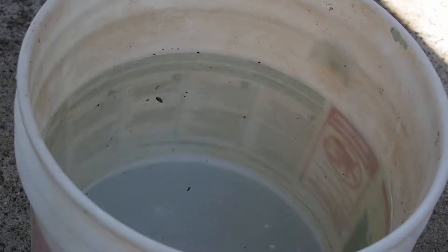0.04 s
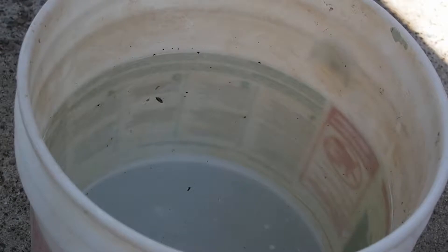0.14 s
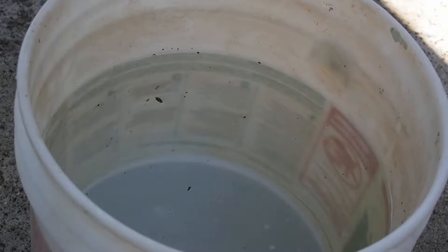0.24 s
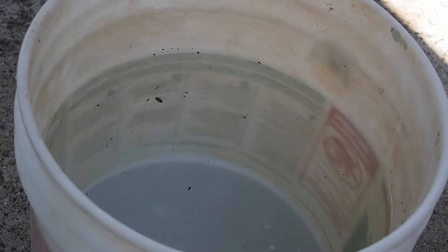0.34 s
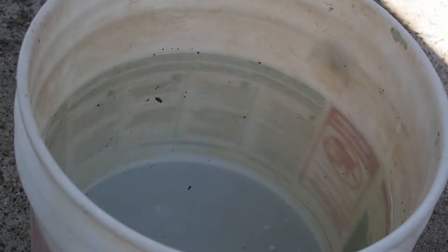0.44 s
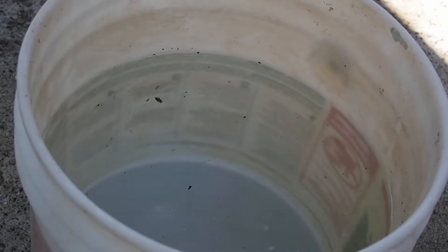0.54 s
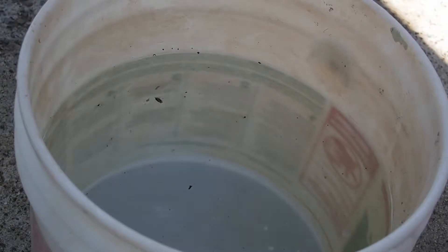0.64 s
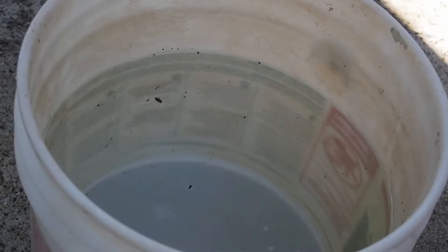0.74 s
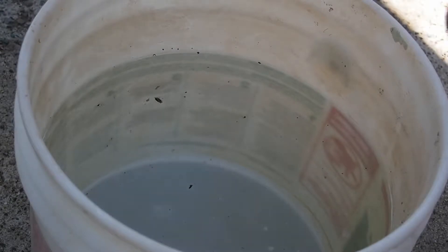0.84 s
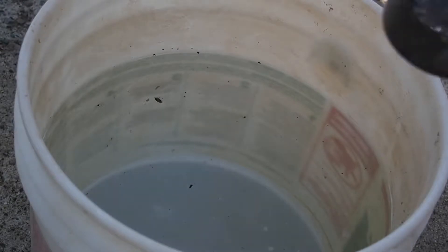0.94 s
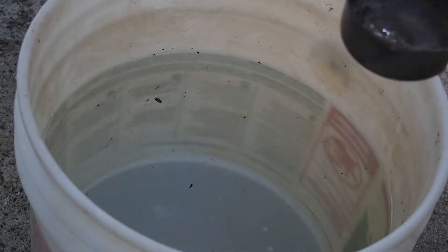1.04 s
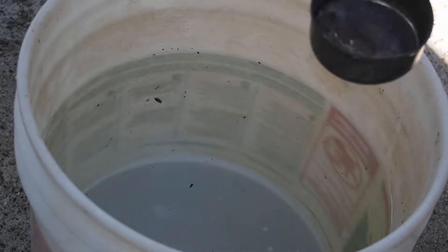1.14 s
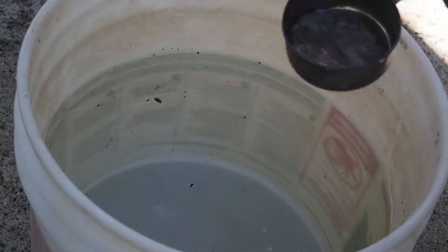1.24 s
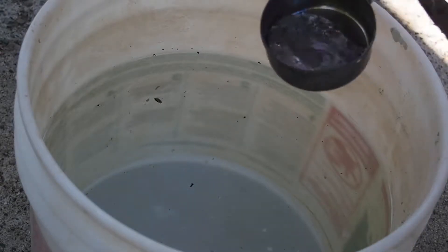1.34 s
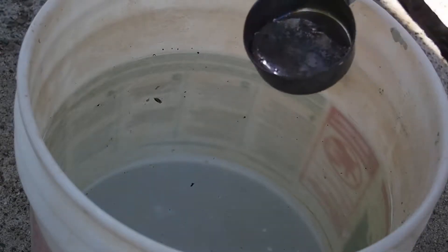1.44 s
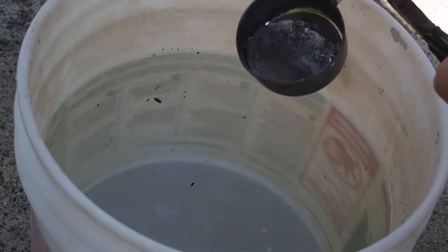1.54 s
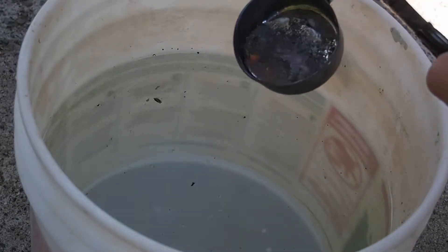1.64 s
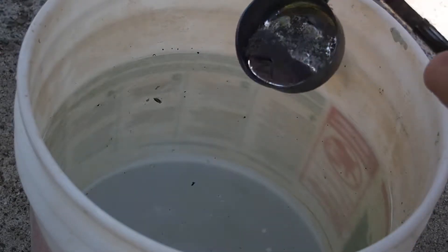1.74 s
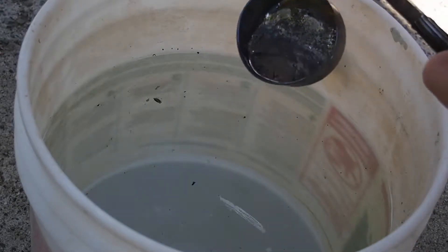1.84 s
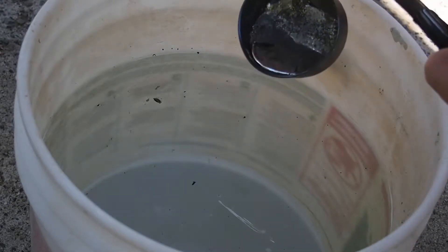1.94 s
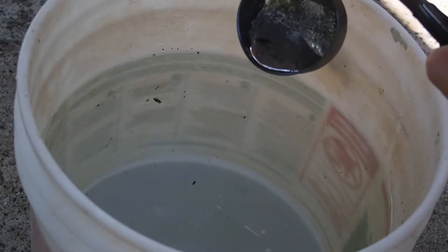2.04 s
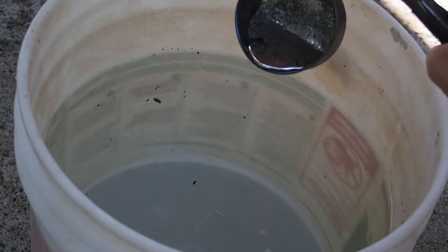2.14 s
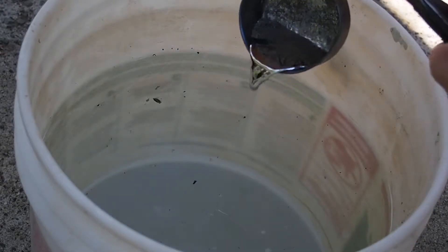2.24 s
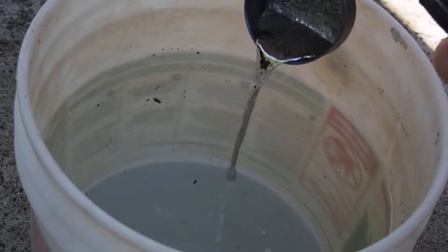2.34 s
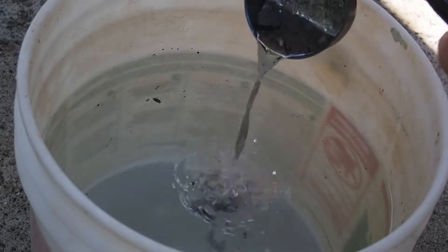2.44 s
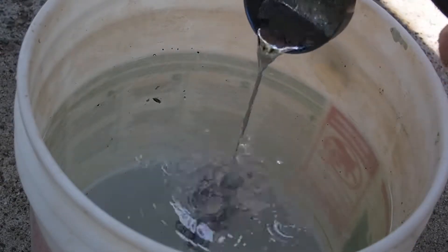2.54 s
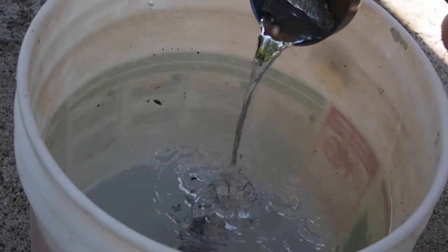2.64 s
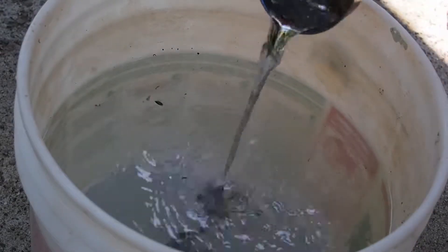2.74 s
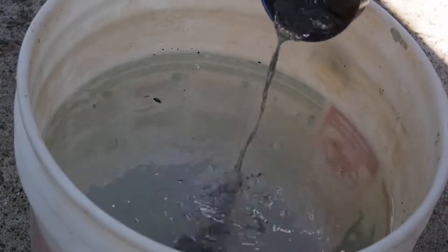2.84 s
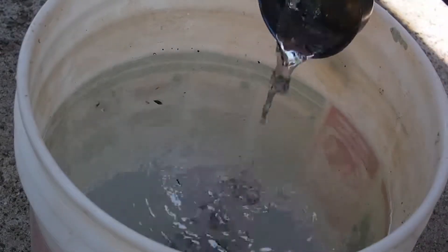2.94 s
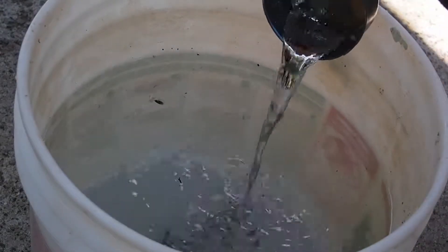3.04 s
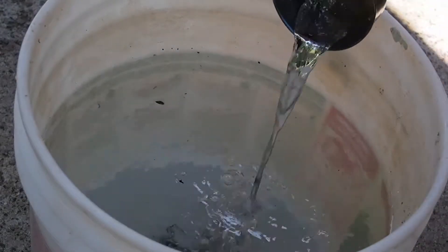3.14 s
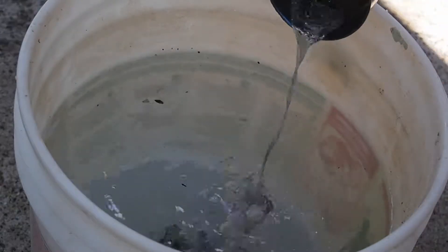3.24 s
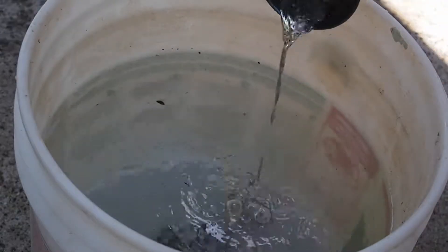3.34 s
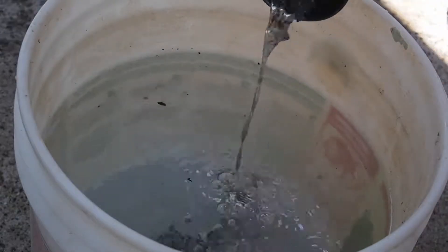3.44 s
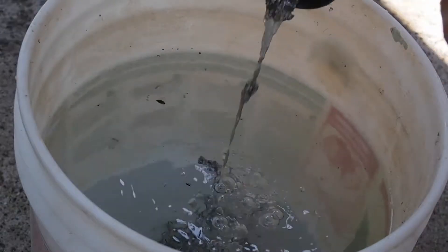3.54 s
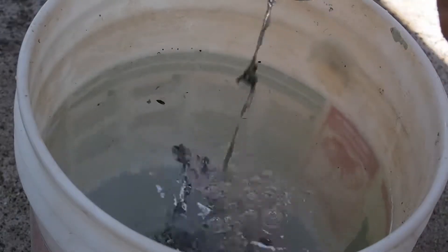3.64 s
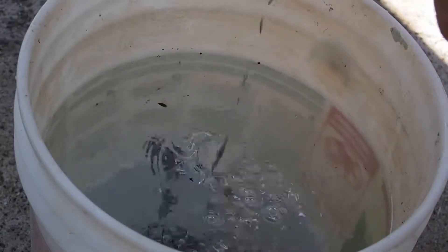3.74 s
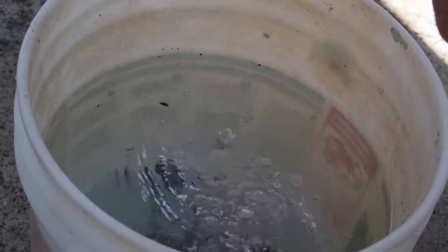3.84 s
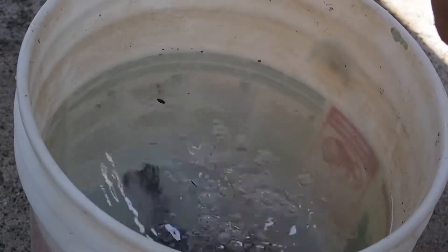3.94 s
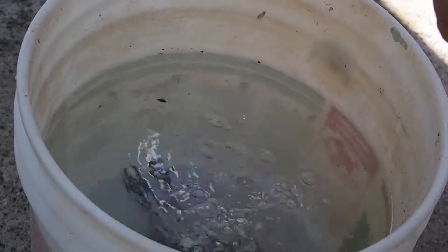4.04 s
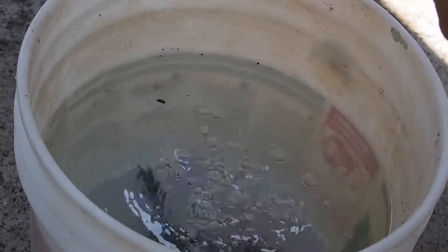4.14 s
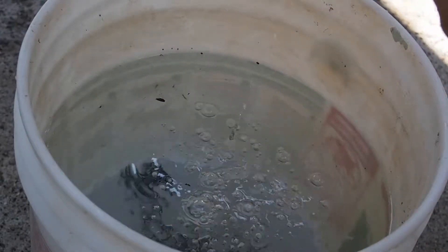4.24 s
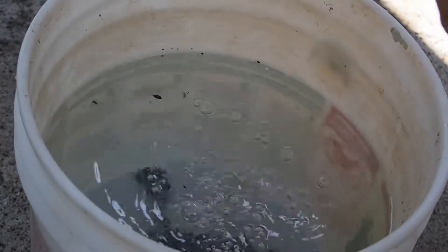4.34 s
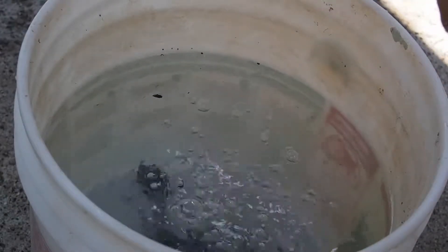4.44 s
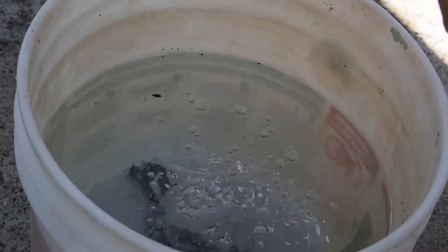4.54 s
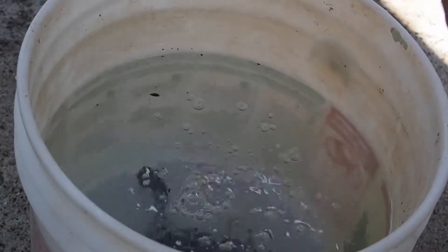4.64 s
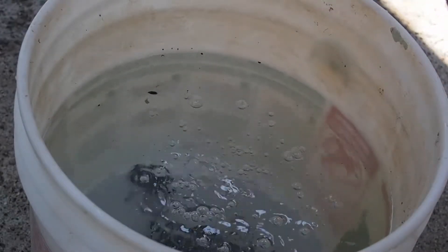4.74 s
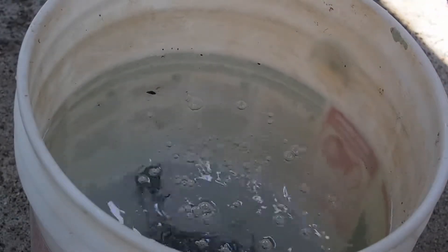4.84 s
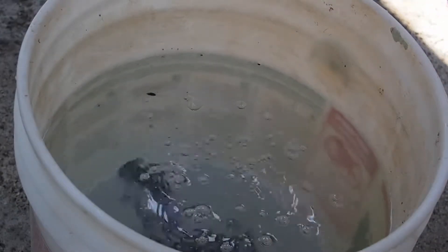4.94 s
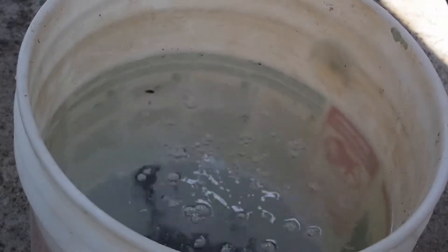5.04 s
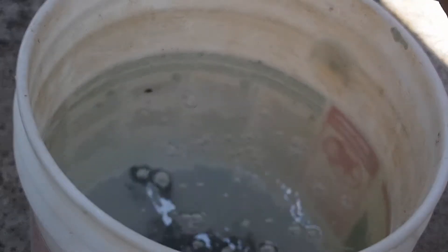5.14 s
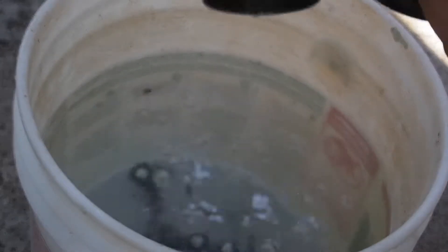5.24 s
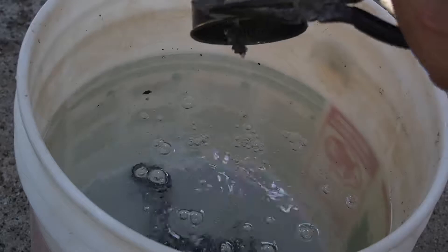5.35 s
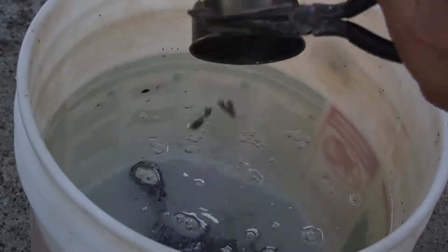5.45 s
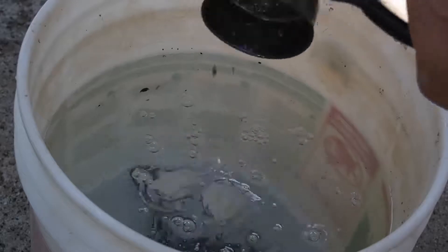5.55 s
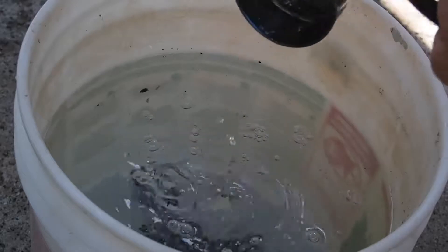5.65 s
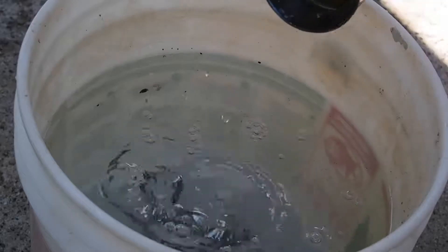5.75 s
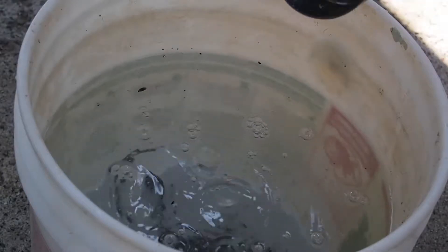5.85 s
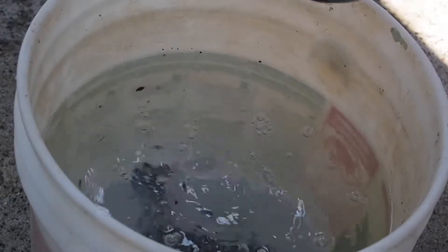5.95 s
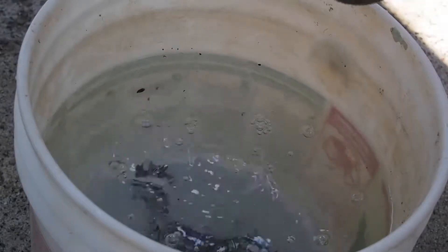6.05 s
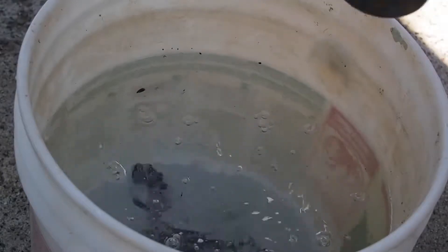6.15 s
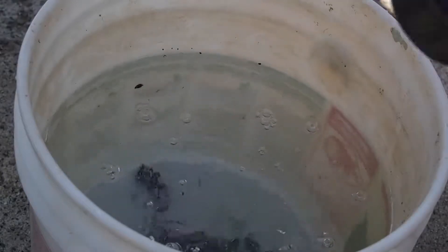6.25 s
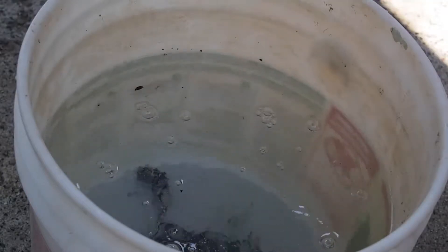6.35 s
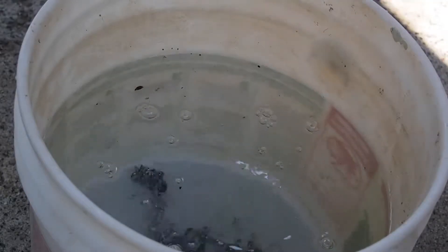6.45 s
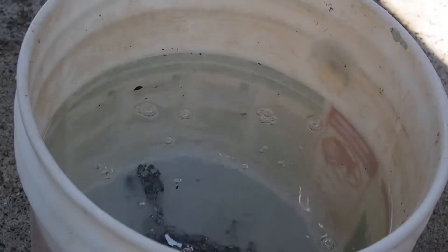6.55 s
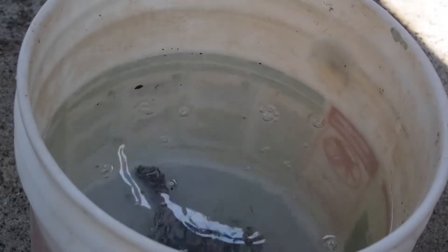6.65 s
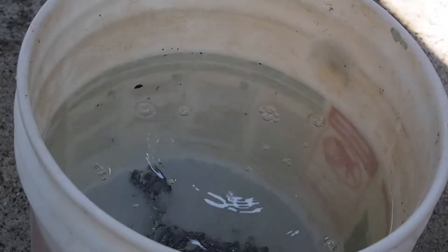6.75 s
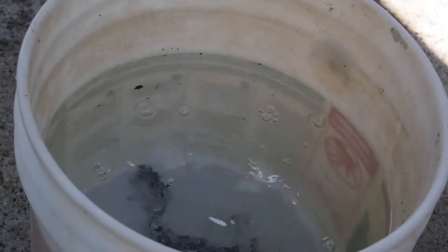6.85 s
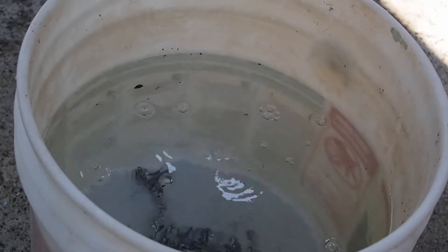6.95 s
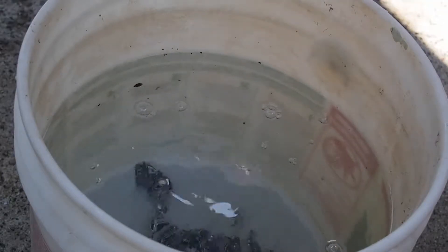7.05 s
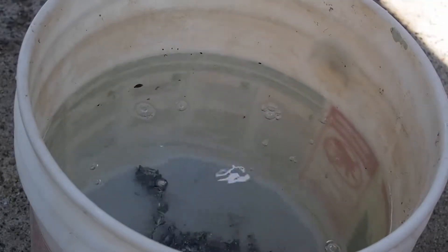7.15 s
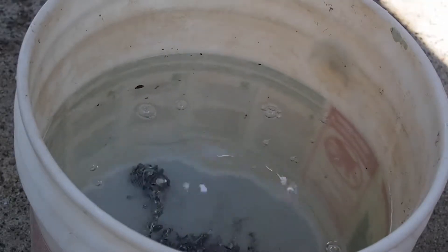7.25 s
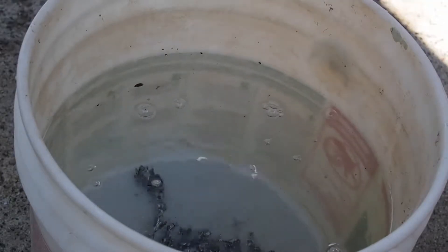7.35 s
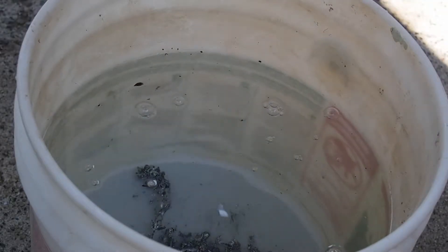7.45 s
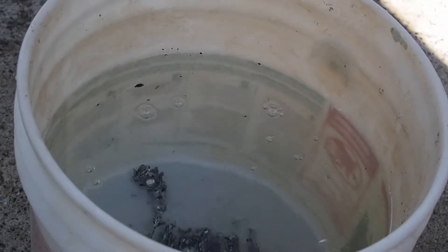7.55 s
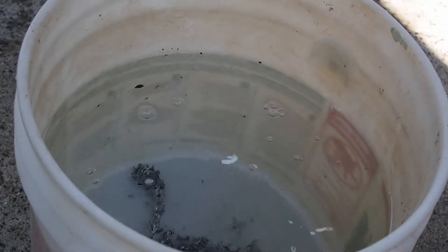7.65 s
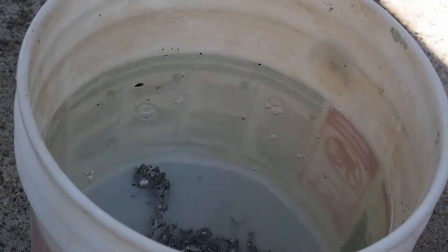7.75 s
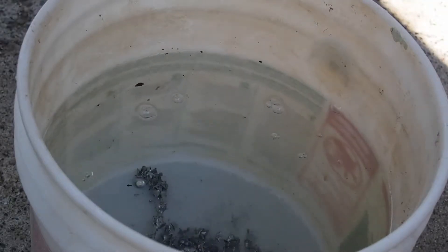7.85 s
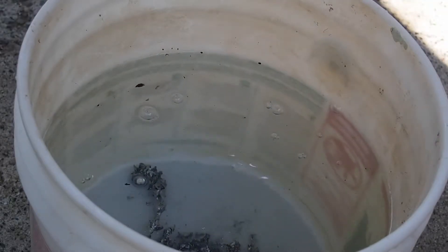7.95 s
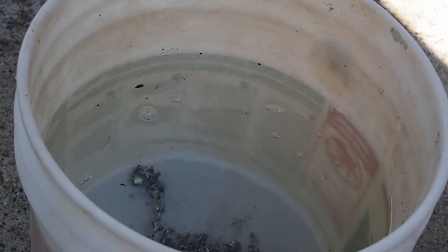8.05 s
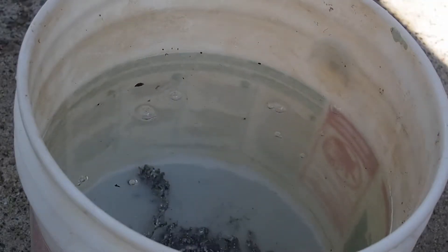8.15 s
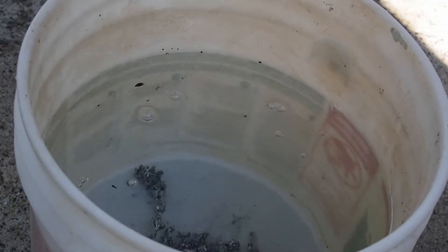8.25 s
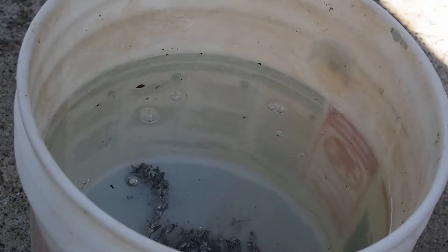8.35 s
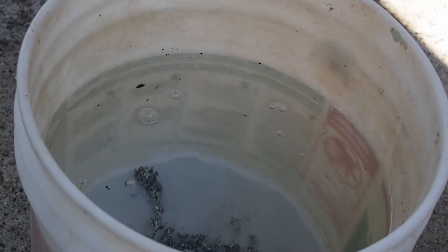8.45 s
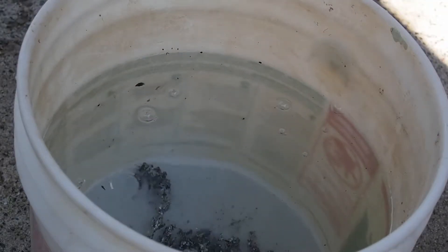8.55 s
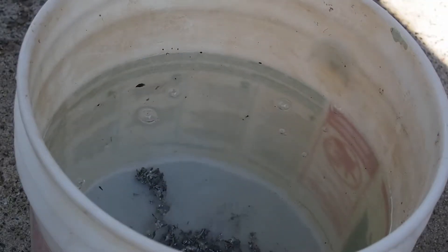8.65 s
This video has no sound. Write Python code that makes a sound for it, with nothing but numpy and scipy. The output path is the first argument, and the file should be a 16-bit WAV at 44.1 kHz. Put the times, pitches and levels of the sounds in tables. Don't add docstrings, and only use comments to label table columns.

```python
import sys
import numpy as np
from scipy import signal
from scipy.fft import rfft, irfft
from scipy.io import wavfile
from scipy.ndimage import uniform_filter1d

SR = 44100
rng = np.random.default_rng(int(sys.argv[2]) if len(sys.argv) > 2 else 0)


def to_wav(s):
    ch = np.atleast_2d(s).T
    pcm = np.round(np.clip(ch, -1, 1) * 32767)
    wavfile.write(sys.argv[1], SR, pcm.astype(np.int16))


def decibels_to_gain(level_db):
    exponent = np.asarray(level_db, float) / 20
    return 10 ** exponent


N = 383229

# pitch in Hz, width in Hz, level in dB.
BUCKET = [(530, 97, -6.5), (964, 99, 1), (1614, 41, 5.5), (1728, 120, 0.5), (2950, 300, -4),
          (5000, 2500, -17), (6370, 260, -6)]


def rms_one(x):
    return x / np.sqrt(np.mean(x ** 2) + 1e-20)


def in_time(rows):
    s, *columns = np.transpose(rows)
    t = np.arange(N) / SR
    gate = np.clip(np.minimum(t - s[0], s[-1] - t) * 200, 0, 1)
    return [np.interp(t, s, c) for c in columns] + [gate]


def at_hz(points, hz):
    points = np.array(points)
    return np.interp(np.log(hz), np.log(points[:, 0]), points[:, 1])


def fft_hz():
    return np.maximum(np.fft.rfftfreq(N, 1 / SR), 1)


def drift(rate, size=N):
    r = np.exp(-2 * np.pi * rate / SR)
    noise = rng.standard_normal(size + SR // 2)
    return rms_one(signal.lfilter([1], [1, -2 * r, r * r], noise)[SR // 2:])


def butter(x, order, hz, kind="low"):
    return signal.sosfilt(signal.butter(order, hz, kind, fs=SR, output="sos"), x)


def resonate(x, hz, width_hz):
    r = np.exp(-np.pi * width_hz / SR)
    w = 2 * np.pi * min(hz, 20000) / SR
    return signal.lfilter([0, np.sin(w)], [1, -2 * r * np.cos(w), r * r], x + 1e-18)


def colour(x, points):
    size = x.shape[-1]
    hz = np.maximum(np.fft.rfftfreq(size, 1 / SR), 1)
    return rms_one(irfft(rfft(x) * decibels_to_gain(at_hz(points, hz)), size))


def grains(per_s, spread_db, size=N):
    sizes = decibels_to_gain(spread_db * np.minimum(rng.exponential(1, size), 5)) * rng.choice([-1, 1], size)
    return sizes * (rng.random(size) < per_s / SR)


def click(size, at=0):
    return np.eye(1, size, at)[0]


def add(out, s, x):
    at = round(s * SR)
    out[at:at + len(x)] += x[:N - at]


def burst(length, rise, fall, size):
    t = np.arange(size) / SR
    return (1 - np.exp(-t / rise)) * np.exp(-np.maximum(t - length, 0) / fall)


def body(x, modes, widen):
    out = 0
    for k, (hz, width, db) in enumerate(modes):
        out = out + (-1) ** k * decibels_to_gain(db) * widen * width / 100 * resonate(x, hz, widen * width)
    return out


def ringing_clicks(events, sharp):
    out = np.zeros(N)
    for s, db, hz in events:
        snap = click(600, 8) + 0.1 * grains(500, 2.0, size=600)
        add(out, s, decibels_to_gain(db + 3.5) * resonate(snap, hz, sharp * hz))
    return out


def yard():
    # frequency in Hz, level in dB per Hz.
    air_spectrum = [(18, -29), (30, -48), (48, -13), (84, -9), (229, -2.5), (420, -18.5), (506, -9.5),
                    (1120, -10.5), (1620, -14.5), (1840, -19.5), (3050, -19.5), (4070, -24.5),
                    (14100, -36.5), (15200, -36), (16500, -65)]
    # pitch in Hz, width in Hz, level in dB.
    hum_lines = [(58.8, 3.2, -48.5), (119.2, 4.8, -53), (170.2, 6.7, -49.5), (235.4, 4.4, -50),
                 (1760, 4.7, -55.5)]
    # frequency in Hz, likeness from 0 to 1.
    likeness = [(60, 1), (180, 0.96), (550, 0.97), (1650, 0.94), (4970, 0.13), (15000, 0.091)]
    air_db = -41
    mid, side = rfft(rng.standard_normal((2, N)) * decibels_to_gain(1.03 * drift(27)))
    alike = np.clip(at_hz(likeness, fft_hz()), -1, 1)
    pair = np.sqrt(1 + alike) * mid + np.sqrt(1 - alike) * side * [[1], [-1]]
    out = decibels_to_gain(air_db) * colour(irfft(pair, N), air_spectrum)
    t = np.arange(N) / SR
    for hz, width, db in hum_lines:
        line = np.sin(2 * np.pi * hz * t + width / 4 * drift(width))
        out = out + decibels_to_gain(db + 0.5) * line * decibels_to_gain(0.36 * width * drift(width))
    return out


def slurred(s, slur, hold, hz, db, start=0.96, accent_db=6.5):
    fade_s, fade_db, note_sag = 0.19, 32, 0.99
    held = s + slur + hold
    return [(s, start * hz, db + accent_db), (s + 0.65 * slur, (0.4 + 0.6 * start) * hz, db), (s + slur, hz, db),
            (held, hz, db), (held + fade_s, note_sag * hz, db - fade_db)]


def whistle(rows, partials):
    hz, db, on = in_time(rows)
    sung, out = on > 0, np.zeros(N)
    size = sung.sum()
    phase = 2 * np.pi * np.cumsum(hz[sung] * (1 + 0.0029 * drift(132, size))) / SR
    out[sung] = sum(decibels_to_gain(p_db + 1.5 * drift(45, size)) * np.sin(k * phase) for k, p_db in partials)
    return np.sqrt(2) * on * decibels_to_gain(db) * out


def birds():
    # start in seconds, slur in seconds, hold in seconds, note in Hz, level in dB.
    low_calls = [
        (0.017, 0.074, 0.022, 5625, -43.5),
        (6.494, 0.12, 0.047, 5550, -45),
    ]
    # start in seconds, slur in seconds, hold in seconds, note in Hz, level in dB.
    high_calls = [
        (1.548, .06, .11, 8000, -44),
    ]
    # start in seconds, length in seconds, pitch in Hz, level in dB.
    far_calls = [
        (1.775, .025, 3100, -54),
        (1.795, .04, 3480, -57),
        (5.22, .2, 13100, -68),
        (6.3, .1, 7600, -66),
    ]
    low_voice = [(0.5, -26), (0.958, -15), (1, 0), (1.5, -22), (2, -26)]   # (multiple, dB)
    high_voice = [(1, 0), (0.925, -9)]
    out = whistle(slurred(*high_calls[0], start=0.968, accent_db=-6), high_voice)
    for call in low_calls:
        out += whistle(slurred(*call), low_voice)
    for s, length, hz, db in far_calls:
        out += whistle([(s, hz, db), (s + length, 1.02 * hz, db)], [(1, 0)])
    return out


def scuffs_and_stones():
    # start in seconds, length in seconds, level in dB, grit pitch
    # in Hz.
    scuff_rows = [(0.596, 0.065, -44, 8100), (1.555, 0.089, -39, 4540), (4.798, 0.073, -49, 10000),
                  (6.767, 0.13, -41, 2460), (6.912, 0.071, -30.5, 2720), (7.307, 0.035, -37, 9000),
                  (7.408, 0.02, -34, 9000), (7.432, 0.018, -26, 5000), (7.509, 0.065, -39.5, 7800),
                  (7.673, 0.08, -43.5, 5000), (7.785, 0.076, -45, 5000), (8.105, 0.054, -47.5, 3600),
                  (8.257, 0.14, -43, 3530), (8.415, 0.31, -39.5, 2620), (8.596, 0.07, -36.5, 4020)]
    # time in seconds, peak in dB, pitch in Hz.
    stone_rows = [(0.02, -30, 4800), (0.6116, -29, 1610), (1.5693, -31, 4200), (1.5804, -30, 7910),
                  (1.599, -33, 7920), (6.805, -21, 2920), (6.9186, -11, 2920), (8.271, -28, 1410),
                  (8.3113, -27, 2330), (8.3113, -24, 4800), (8.4118, -27, 1600), (8.4302, -27, 1590),
                  (8.4736, -16.5, 2100), (8.5026, -24, 1510), (8.5155, -20.5, 2640), (8.5778, -32, 1340),
                  (8.6065, -27, 3000), (8.6134, -22.5, 2720)]
    out = np.zeros(N)
    for s, length, db, hz in scuff_rows:
        band = [(hz / 6, -30), (hz / 2.44, -2), (hz, 0), (3.1 * hz, -10), (40000, -30)]
        grit = colour(grains(4000, spread_db=5.0, size=9000), band)
        add(out, s, decibels_to_gain(db) * grit * burst(0.5 * length, 0.043 * length, 0.5 * length, 9000))
    return out + ringing_clicks(stone_rows, sharp=0.23)


def all_pops():
    # time in seconds, peak in dB, crack in dB relative to the pocket.
    deep = [
        (2.478, -5.5, -3),
        (2.715, 3.5, -16.5),
        (2.75, -2.5, -16),
        (2.794, -14, -8),
        (3.011, -5, -23),
        (3.237, -7.5, -5.5),
        (3.499, -1.5, -15),
    ]
    # time in seconds, peak in dB, crack in dB relative to the pocket.
    large = [(2.532, 2, -22), (2.588, -1, -18), (2.811, -0.5, -15), (2.844, -3.5, -8.5), (2.88, -7, -8),
             (2.901, -2, -16), (2.926, -5.5, -7), (3.153, -4, -33), (3.459, -2.5, -14), (3.536, -1.5, -20),
             (3.868, -5.5, -34)]
    # time in seconds, peak in dB, crack in dB relative to the pocket.
    middle = [(2.3539, 2.5, -13.5), (2.376, -4, -14), (2.406, -14, -15), (2.551, -7, -11), (2.66, -12, -23),
              (2.791, -8, -9.5), (3.001, -1.5, -12), (3.03, -2.5, -11), (3.069, -8, -7), (3.081, 2, -21),
              (3.116, -9, -12), (3.148, -4, -11), (3.183, -5.5, -4), (3.21, -4.5, -7.5),
              (3.296, -9.5, -7.5), (3.32, -7, -9), (3.347, -17.5, 1.5), (3.48, -8, -4.5),
              (3.661, -10.5, 1.5), (3.855, -14, -16)]
    # time in seconds, peak in dB, crack in dB relative to the pocket.
    small = [(2.426, -2, -28), (2.507, -7, -8), (2.513, -6, -32), (2.583, -17, 1), (2.639, 0.5, -8.5),
             (2.677, -12, -14), (2.685, -2, -9.5), (2.907, -4.5, -14), (3.397, -0.5, -12),
             (3.422, -12, -14), (3.447, -8, -7), (3.578, -4, -15.5), (3.594, -18, -1), (3.645, -19, 2),
             (3.736, -29, -20), (3.761, -7.5, -12), (3.772, -3, -33), (3.808, -3.5, -8), (3.971, -17, -20)]
    sizes = [(deep, 567), (large, 950), (middle, 1795), (small, 2720)]
    return sorted((s, db, hz, crack_db) for rows, hz in sizes for s, db, crack_db in rows)


def pops():
    out, t = np.zeros(N), np.arange(3000) / SR
    pitch_scatter = 0.012
    for s, db, hz, crack_db in all_pops():
        rebound = rng.random((4, 2))
        spot = rng.standard_normal(len(BUCKET))
        kick = np.zeros(len(t))
        kick[70] = -1
        kick[(100 + 500 * rebound[:, 0]).astype(int)] = 0.44 * rebound[:, 1] - 0.08
        pocket = resonate(kick, hz * (1 + pitch_scatter * spot[0]), 0.12 * hz + 60)
        crack_shape = burst(0.0015, 0.001, 0.0015, len(t)) + 0.04 * np.exp(-t / 0.0018)
        crack = rng.standard_normal(len(t)) * crack_shape
        crack = 0.74 * crack + 0.23 * resonate(crack, 4500 + 8000 * rebound[0, 1], 3300)
        struck = [(f, w, mode_db + 4.7 * np.clip(chance, -2, 1)) for (f, w, mode_db), chance in zip(BUCKET, spot)]
        knock = body(kick + 0.12 * crack, struck, widen=2.38)
        pop = decibels_to_gain(db - 5.5) * pocket + decibels_to_gain(db + crack_db + 1.5) * crack + decibels_to_gain(db - 22.5) * knock
        add(out, s - 0.0008, pop)
    return out


def thumps():
    # time in seconds, level in dB, pitch in Hz, width in Hz.
    landings = [
        (7.143, -33, 260, 200),
        (7.1462, -10, 1326, 24),
        (7.1462, -23, 2026, 17),
        (7.2998, -20, 1300, 60),
        (7.32, -21, 1300, 60),
    ]
    s, db, hz, crack_db = np.transpose(all_pops())
    kicks = np.zeros(N)
    kicks[(s * SR).astype(int) + 30] = decibels_to_gain(3.1 * db - 39)
    out = resonate(kicks, 90, 160)
    for s, db, hz, width in landings:
        add(out, s, decibels_to_gain(db) * resonate(click(9000), hz, width))
    return out


def boil():
    # time in seconds, seething in dB, spray hiss in dB relative to seething.
    boil_curve = [
        (2.36, -30.5, 14),
        (2.53, -20, -5),
        (2.65, -27.5, 4.5),
        (2.92, -19.5, -2),
        (2.955, -28.5, -3),
        (3.03, -23.5, -0.5),
        (3.55, -29, 1.5),
        (3.75, -23.5, -17),
        (4.19, -46, -9),
    ]
    # frequency in Hz, level in dB per Hz.
    spray_spectrum = [(1180, -44), (2000, 3.5), (2800, 5), (4030, -10), (6330, -3), (14300, 1),
                      (16100, -14), (16600, -84)]
    seethe_db, hiss_db, on = in_time(boil_curve)
    stream, thrown, simmer = on * decibels_to_gain(seethe_db), np.zeros(N), np.zeros(N)
    lead_s, settle_s = 0.0004, 0.004
    for s, db, hz, crack_db in all_pops():
        add(thrown, s - lead_s, decibels_to_gain(db + crack_db - 4) * burst(0, lead_s, settle_s, 6000))
    add(simmer, 4.205, decibels_to_gain(-32) * burst(0, 0.0084, 0.54, SR))
    clumps = drift(23)
    fine = grains(1500 * decibels_to_gain(5.5 * clumps), spread_db=3.5)
    dealt, fizz = rng.integers(0, 14, N), np.zeros(N)
    for k, hz in enumerate(np.geomspace(620, 4600, 14)):
        level = decibels_to_gain(3.4 * drift(14) - 2.1 * np.log2(hz))
        fizz += level * resonate(fine * (dealt == k), hz, 0.13 * hz)
    seethe = rms_one(rms_one(fizz) + rms_one(body(fine, BUCKET, widen=0.68)))
    spray = colour(grains(6000 * decibels_to_gain(4.6 * clumps), spread_db=2.5), spray_spectrum)
    spray_gain = stream * decibels_to_gain(hiss_db - 5) + thrown + simmer * decibels_to_gain(-12)
    return decibels_to_gain(-9) * ((stream + simmer) * seethe + decibels_to_gain(-1) * spray_gain * spray)


def fizzles():
    # time in seconds, peak in dB, pitch in Hz.
    films = [(2.3752, -22, 5400), (2.4077, -20, 4020), (2.4337, -19, 3480), (2.443, -21, 6170),
             (2.4575, -22, 7650), (2.467, -18, 7650), (2.4854, -15, 7990), (2.492, -22, 6180),
             (2.495, -12, 4400), (2.5326, -21, 6210), (2.5604, -25, 6020), (2.5824, -16, 6160),
             (2.596, -31, 3540), (2.61, -22, 6170), (2.7062, -13, 6040), (2.724, -16, 5630),
             (2.8534, -13, 5600), (2.8838, -11, 6160), (2.9594, -24, 6510), (3.0172, -14, 3540),
             (3.061, -18, 6840), (3.0714, -11, 12200), (3.0782, -11, 6100), (3.0884, -13, 3480),
             (3.1225, -17.5, 3560), (3.155, -18, 6290), (3.2154, -14, 6350), (3.232, -17, 10600),
             (3.2813, -23, 6270), (3.352, -16.5, 9050), (3.535, -17, 6100), (3.6106, -16, 6280),
             (3.6735, -19, 9470), (3.706, -11, 6250), (3.794, -10, 11600), (3.8057, -26, 5910),
             (3.9415, -10, 6260), (3.9737, -8.5, 6050), (4.0725, -33, 12300), (4.2665, -20, 15000),
             (4.276, -30, 2600), (5.6875, -24, 5960), (2.6115, -19, 8450)]
    out = np.zeros(N)
    for s, db, hz in films:
        tear = rng.standard_normal(500) * burst(0.0011, 0.00043, 0.0017, 500)
        add(out, s - 0.0006, decibels_to_gain(db - 14.5) * resonate(tear, hz, 0.087 * hz))
    return out


def rebounds():
    # first rebound in seconds, peak in dB, pitch in Hz, period in seconds, loss in dB per rebound.
    swells = [
        (2.7245, -12.5, 510, 0.0105, 3.5),
        (3.2518, -14, 477, 0.0115, 2.5),
    ]
    t60 = 0.021
    return [(s + k * period, db - k * loss_db, hz, t60) for s, db, hz, period, loss_db in swells for k in range(5)]


def gulps():
    # time in seconds, peak in dB, pitch in Hz, ring t60 in seconds.
    bubbles = [(2.432, -12.5, 500, 0.023), (2.479, -1.5, 626, 0.01), (2.716, -4.5, 580, 0.016),
               (2.752, -23, 560, 0.023), (2.775, -21, 450, 0.04), (2.797, -21, 520, 0.027),
               (2.815, -20, 490, 0.03), (2.845, -10.5, 510, 0.025), (2.857, -19, 460, 0.03),
               (2.879, -14, 520, 0.017), (2.855, -22, 1200, 0.033), (2.927, -17, 500, 0.019),
               (2.6, -20, 470, 0.016), (3.239, -1.5, 540, 0.013), (3.355, -31, 710, 0.2),
               (3.461, -20, 970, 0.04), (3.499, -17.5, 340, 0.094), (3.507, -6.5, 470, 0.028),
               (3.522, -6.5, 485, 0.023), (3.557, -25, 670, 0.034), (2.377, -15, 1260, 0.023),
               (2.39, -27, 1400, 0.04), (2.408, -12, 1500, 0.018), (2.412, -19, 1460, 0.046),
               (5.689, -20, 1450, 0.02), (5.57, -30, 2950, 0.19), (5.53, -29, 1600, 0.08),
               (5.52, -32.5, 520, 0.095), (5.683, -30, 4000, 0.098), (5, -26, 700, 0.033),
               (3.76, -24, 470, 0.19), (3.5, -12.5, 250, 0.099)]
    out, t = np.zeros(N), np.arange(8000) / SR
    for s, db, hz, t60 in list(bubbles) + rebounds():
        phase = 2 * np.pi * hz * np.cumsum(1 + 0.27 * np.exp(-t / 0.0019)) / SR
        add(out, s, decibels_to_gain(db - 60 * t / t60) * np.sin(phase) * burst(1, 0.0006, 1, len(t)))
    return out


def puffs():
    # start in seconds, length in seconds, hiss in dB, cavity end pitch in Hz, cavity level in dB.
    flashes = [
        (3.424, 0.018, -33, 2990, -29.5),
        (3.604, 0.048, -25, 2515, -29),
        (3.688, 0.095, -23.5, 2233, -32),
        (3.856, 0.022, -24, 3100, -29),
        (3.945, 0.031, -28, 3177, -22),
        (4.1682, .04, -26.5, 2913, -25),
        (4.206, 0.057, -33, 3840, -44),
        (4.371, 0.0015, -31, 5970, -26.5),
        (5.507, 0.065, -19.5, 2950, -22.5),
        (5.665, 0.019, -25.5, 3900, -37),
    ]
    # frequency in Hz, level in dB per Hz.
    hiss_spectrum = [(710, -27), (1200, -9), (2560, -3.5), (3340, -5), (4160, -5.5), (6320, -4),
                     (13400, -5), (15800, -5), (16600, -49)]
    sag_hz_per_s, dulls_db_per_s = 9000, 84
    out, t = np.zeros(N), np.arange(9000) / SR
    size = len(t)
    for s, length, hiss_db, end_hz, cavity_db in flashes:
        hiss = butter(colour(rng.standard_normal(size), hiss_spectrum), 2, 1.4 * end_hz, "high")
        dull = butter(hiss, 2, 7000)
        hiss = dull + (hiss - dull) * decibels_to_gain(-dulls_db_per_s * t)
        opening = 1.4 * np.exp(-t / 0.0026)
        hz = end_hz * (1 + opening) + sag_hz_per_s * np.maximum(length - t, 0)
        phase = 2 * np.pi * np.cumsum(hz) / SR
        overtone = decibels_to_gain(-8.5) * drift(400, size) * np.sin(1.9 * phase)
        tone = drift(220, size) * np.sin(phase) + overtone
        jet = burst(length, 0.11 * length, 0.00054, size) * decibels_to_gain(1.7 * drift(140, size))
        fading = 0.37 * burst(length, length, 0.042, size)
        tone = decibels_to_gain(cavity_db + 6) * tone * burst(1, 0.45 * length, 1, size)
        ring = 0.0011 * resonate((jet + fading) * tone, end_hz, 33)
        add(out, s, (jet + fading) * decibels_to_gain(hiss_db) * hiss + (jet + 0.1 * fading) * tone + ring)
    thrum = grains(2000, spread_db=4) * uniform_filter1d(np.abs(out), size=400)
    return out + decibels_to_gain(-30) * body(thrum, BUCKET[:4], widen=1.7)


def squeaks():
    # start in seconds, length in seconds, from pitch in Hz, to pitch in Hz, level in dB.
    gaps = [(3.615, 0.025, 3600, 2340, -31), (3.725, 0.063, 3400, 1500, -27.5),
            (3.855, 0.013, 9440, 5480, -26.5), (3.87, 0.014, 12500, 7640, -30),
            (3.875, .009, 13800, 13400, -22), (3.943, 0.013, 7000, 5800, -21),
            (3.952, .018, 13700, 13300, -28), (3.957, 0.013, 11600, 7700, -22),
            (4.169, 0.0107, 8900, 5000, -29), (5.667, .02, 11500, 4030, -27.5),
            (4.19, .012, 8500, 7500, -27), (4.192, 0.016, 6770, 5000, -24), (3.94, .003, 13800, 8860, -22),
            (5.515, 0.042, 6600, 6100, -25), (5.518, 0.039, 5700, 5000, -23.5)]
    out, t = np.zeros(N), np.arange(4000) / SR
    for s, length, from_hz, to_hz, db in gaps:
        hz = to_hz + (from_hz - to_hz) * np.exp(-2.5 * t / length)
        tone = drift(340, len(t)) * np.sin(2 * np.pi * np.cumsum(hz) / SR)
        add(out, s, decibels_to_gain(db) * tone * burst(length, 0.00057, 0.19 * length, len(t)))
    return out


def spit():
    # time in seconds, peak in dB, ring pitch in Hz.
    s, db, hz = (4.1005, -3, 13200)
    out = np.zeros(N)
    air = rng.standard_normal(4000) * burst(0.002, 0.0005, 0.0018, 4000)
    air = butter(air, 10, 12400, "high")
    add(out, s, decibels_to_gain(db) * (air + 0.027 * resonate(air, hz, 50)))
    return out


def ticks():
    # time in seconds, peak in dB.
    bursts = [
        (4.312, -25),
        (4.3684, -11),
        (4.41, -23),
        (4.5536, -36),
        (4.634, -39),
        (4.819, -34),
        (5.046, -31),
        (5.315, -34),
    ]
    return ringing_clicks([(s, db, 6500) for s, db in bursts], sharp=0.31)


def cup():
    # time in seconds, peak in dB, brightness in dB per octave.
    knocks = [(7.146, -8, 0.5), (7.241, -3.5, 1.5), (7.262, -19, -4), (7.272, -14, -6), (7.282, -24, -7),
              (7.3, -13, -16), (7.3202, -15, 0), (7.383, -55, 21), (7.4212, -9, -1.5), (7.435, -23.5, 11),
              (7.454, -17, -2), (7.473, -30, 5), (7.517, -34, 11), (7.556, -28, -10), (7.573, -21, -1),
              (7.594, -24, 4.5), (7.619, -21, 0.5), (7.639, -21, -5), (7.67, -21, -7), (7.772, -34, 2),
              (7.798, -21, -7), (7.935, -39, 9), (7.9695, -22.5, -15), (8.0407, -35, -13), (8.126, -24, -4),
              (8.2402, -28.5, -3)]
    # time in seconds, level in dB, brightness in dB per octave, fade in seconds.
    slide_rows = [
        (7.146, -26.5, 1, 0.037),
        (7.16, -29, 4.5, 0.035),
        (7.19, -21, 0, 0.031),
        (7.239, -18, -7, 0.092),
        (7.431, -30.5, 7, 0.049),
        (7.688, -36.5, 1.5, 0.026),
        (7.794, -35.5, 0.5, 0.032),
        (7.96, -43, -2, .04),
        (8.104, -40, -1, .03),
        (8.125, -41, 0, 0.035),
    ]
    # pitch in Hz, width in Hz, level in dB.
    steel_modes = [(1143, 23, -12.5), (1269, 19, -10), (1351, 21.4, -5.5), (1580, 120, -25),
                   (1710, 41, -13), (2004, 29, -8.5), (2330, 55, -10), (2564, 40, -11.5), (3038, 28, -5),
                   (3100, 40, -11), (3735, 41, -12), (4060, 42, -6.5), (4090, 28, -18), (5760, 60, -28),
                   (6810, 30, -7.5), (10240, 120, -14), (11570, 240, -7)]
    lying_s, lying_pitch, lying_damp = 7.72, 1.024, 1.5
    first = 7 * SR
    size = N - first
    slide_s, slide_db, slide_tilt, fade = np.transpose(slide_rows)
    slides = np.zeros((len(slide_rows), N))
    for row, when, fade_s in zip(slides, slide_s, fade):
        add(row, when, burst(0.01, 0.0018, fade_s, SR))
    slides = slides[:, first:]
    s, db, tilt = np.transpose(knocks)
    at, out = (s * SR).astype(int) + 20 - first, np.zeros(N)
    t = (first + np.arange(size)) / SR
    settled = np.clip(t - 7.19, 0, 0.25)
    lying = first + np.arange(size) > lying_s * SR
    for hz, width, mode_db in steel_modes:
        octaves = np.log2(hz / 1340)
        drive = decibels_to_gain(slide_db - 21.5 + slide_tilt * octaves) @ slides
        drive = drive * decibels_to_gain(1.6 * drift(17, size)) * grains(5000, 2.87, size)
        drive[at] += decibels_to_gain(db - 13 + tilt * octaves + rng.normal(0, 2.9, len(at)))
        drive = drive * decibels_to_gain(-330 * settled * max(octaves - 1.9, 0))
        upright_ring = resonate(drive * ~lying, hz, 0.8 * width)
        lying_ring = resonate(drive * lying, lying_pitch * hz, lying_damp * width)
        out[first:] += decibels_to_gain(1.12 * mode_db) * (upright_ring + 1.94 * lying_ring)
    grit = colour(grains(9000, 4.9, size), [(1200, -16), (4500, -10), (16500, -14)])
    out[first:] += decibels_to_gain(slide_db - 12 + 2 * slide_tilt) @ slides * grit
    for when, level_db in zip(s, db):
        scrape = 0.062 * rng.standard_normal(300) * burst(0.00043, 0.00038, 0.001, 300)
        add(out, when, decibels_to_gain(level_db - 21) * resonate(click(300, 20) + scrape, 3000, 3800))
    return out


def spread(x, echo_db, side_db, t60, lag, low_hz=410):
    x = butter(x, 4, low_hz, "high")
    t = np.arange(round(0.25 * SR)) / SR
    wash = rng.standard_normal((2, len(t))) * decibels_to_gain(-60 * t / t60) * (t > 0.001)
    wash = butter(wash, 2, 450, "high")
    wash /= np.sqrt(np.sum(wash ** 2, axis=1, keepdims=True))
    treble = butter(wash[1], 1, 3500, "high")
    mid = x + decibels_to_gain(echo_db) * signal.fftconvolve(x, wash[0])[:N]
    wandering = x * np.tanh(1.15 * drift(36))
    side = decibels_to_gain(side_db) * signal.fftconvolve(wandering, treble)[:N]
    left = np.interp(np.arange(N) - lag, np.arange(N), mid + side)
    return np.array([left, mid - side])


def ducking(loud, knee_db, share, release_db_s):
    heard = butter(loud, 2, 2500)
    level = 20 * np.log10(np.abs(heard) + 1e-6)
    ramp = release_db_s * np.arange(N) / SR
    held = np.maximum.accumulate(share * np.maximum(level - knee_db, 0) + ramp) - ramp
    return decibels_to_gain(-uniform_filter1d(held, size=881, origin=440))


def scene():
    far = yard() + spread(birds(), echo_db=1.5, side_db=5.5, t60=0.15, lag=3.1)
    water = pops() + boil() + fizzles() + gulps() + puffs() + squeaks() + spit() + ticks()
    ground = scuffs_and_stones() + cup()
    near = spread(water, echo_db=-12, side_db=-10.5, t60=0.086, lag=0.38) * decibels_to_gain([[-0.2], [0.2]])
    beside = spread(ground, echo_db=-14.5, side_db=-0.5, t60=0.043, lag=2.46, low_hz=576) * decibels_to_gain([[1.1], [-1.1]])
    gain = ducking(water + 0.89 * ground, knee_db=-15, share=1, release_db_s=29)
    return near + beside + thumps() + far * gain


def band_limit(x):
    return signal.sosfilt(signal.butter(12, 16800, fs=SR, output="sos"), x)


def record(dry):
    # frequency in Hz, left minus right in dB.
    port_lean = [(60, -2.5), (380, -2), (2380, -4.5), (15000, -4.5)]
    lean = at_hz(port_lean, fft_hz())
    x = irfft(rfft(dry) * decibels_to_gain([lean / 2, -lean / 2]), N)
    top_cut = signal.cheby2(12, 50, 16750, fs=SR, output="sos")
    x = signal.sosfilt(top_cut, np.clip(x, -1, 1))
    return band_limit(x)


dry = scene()
out = record(dry)
to_wav(out)
```